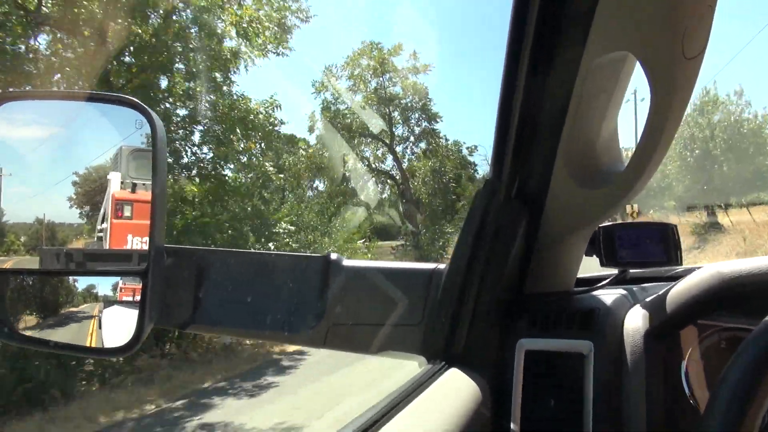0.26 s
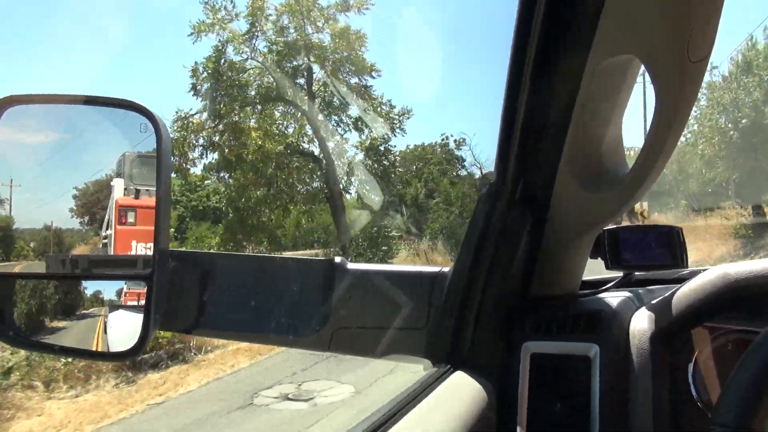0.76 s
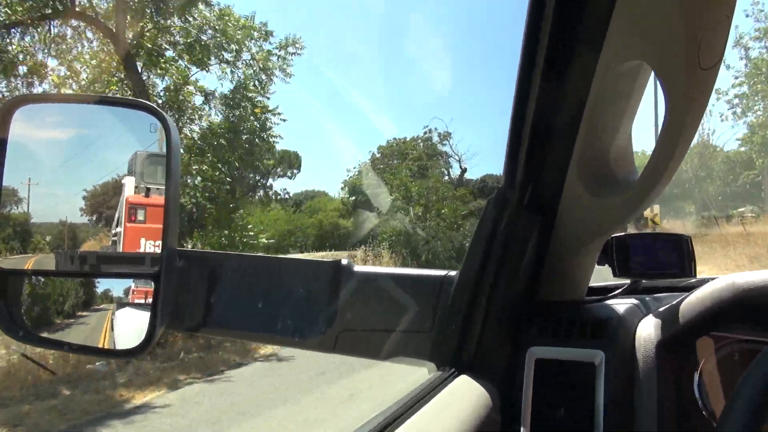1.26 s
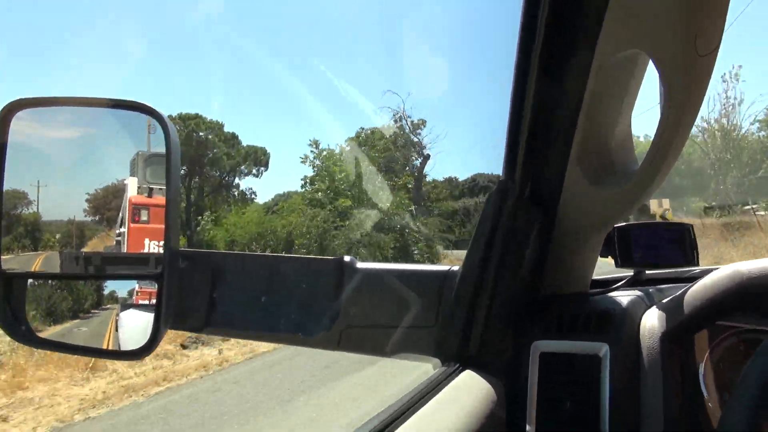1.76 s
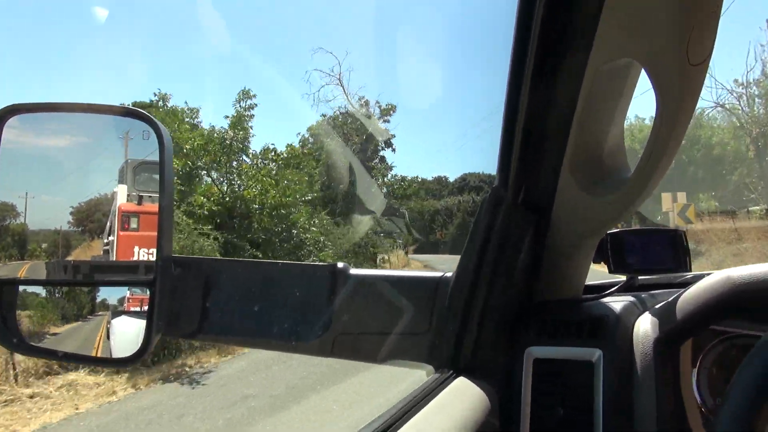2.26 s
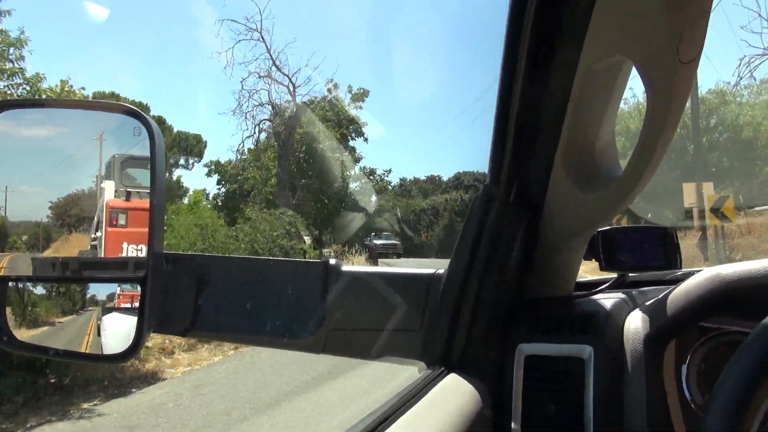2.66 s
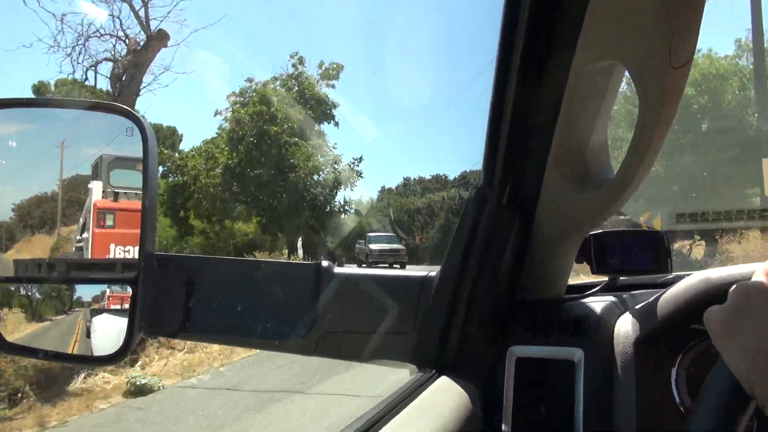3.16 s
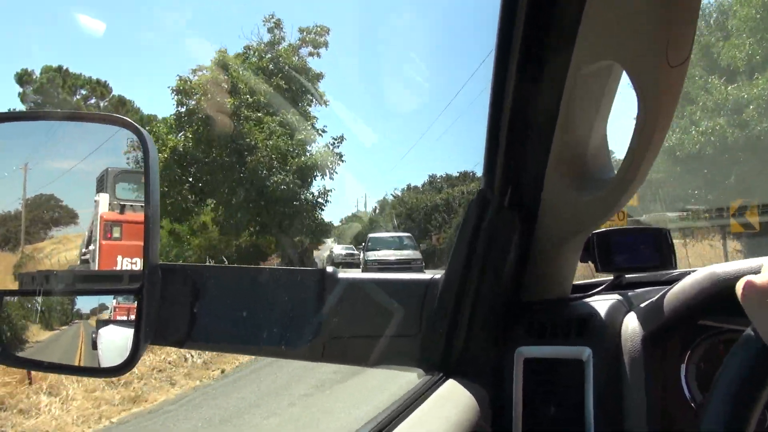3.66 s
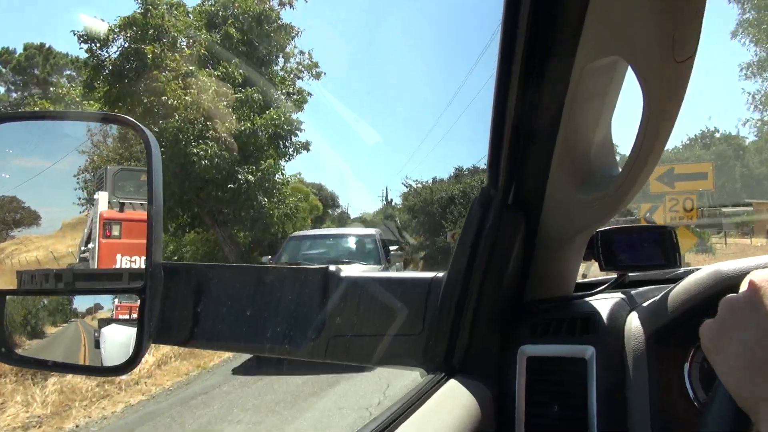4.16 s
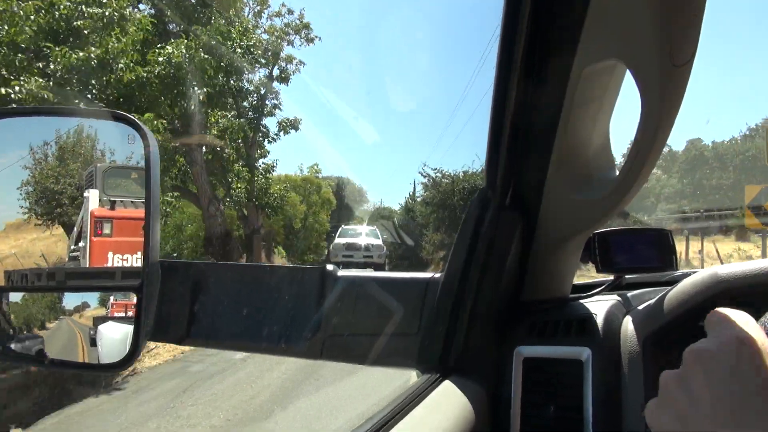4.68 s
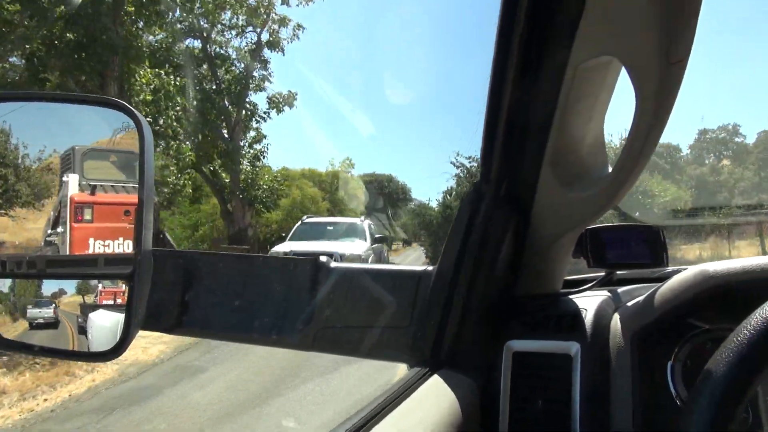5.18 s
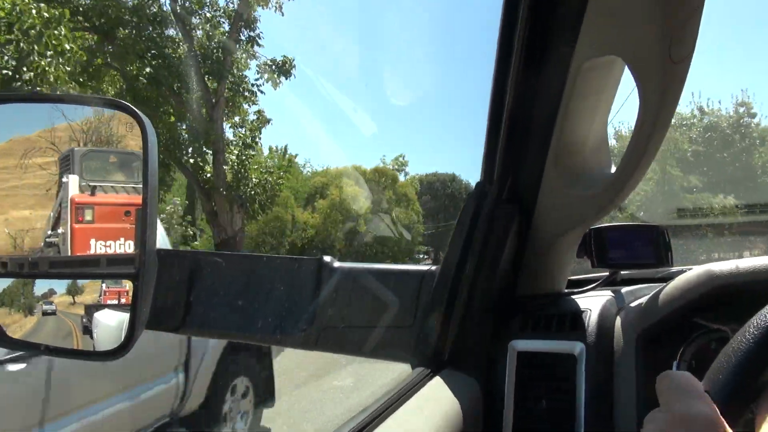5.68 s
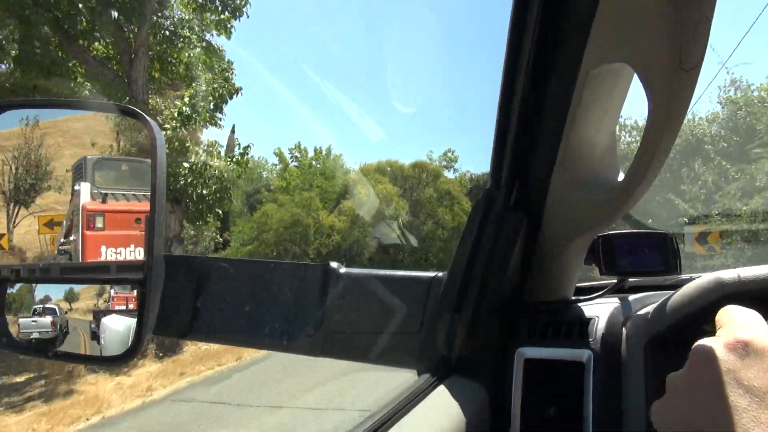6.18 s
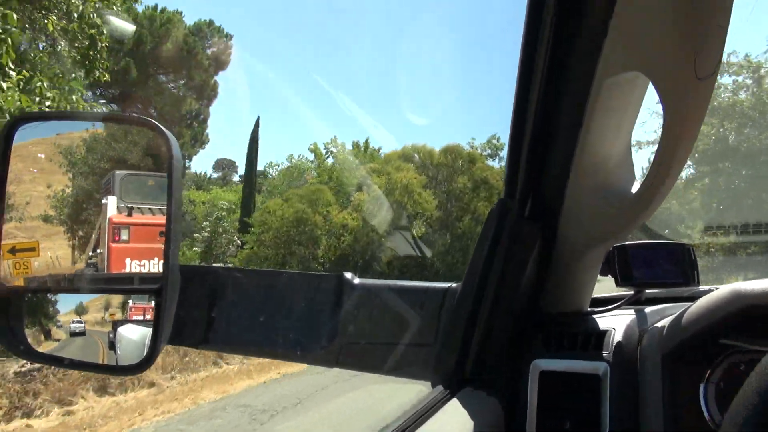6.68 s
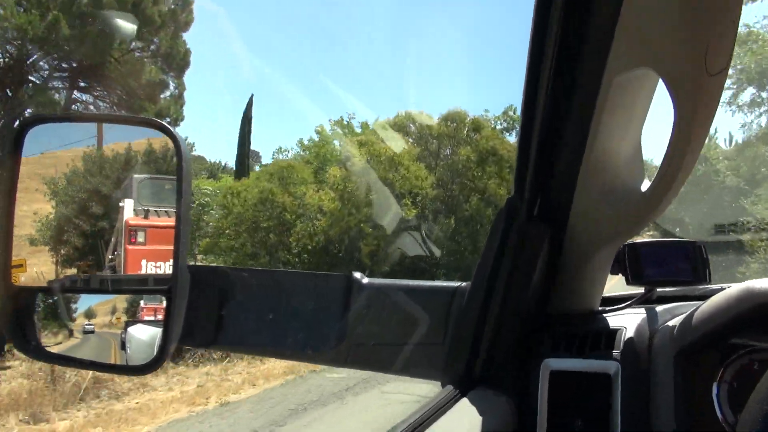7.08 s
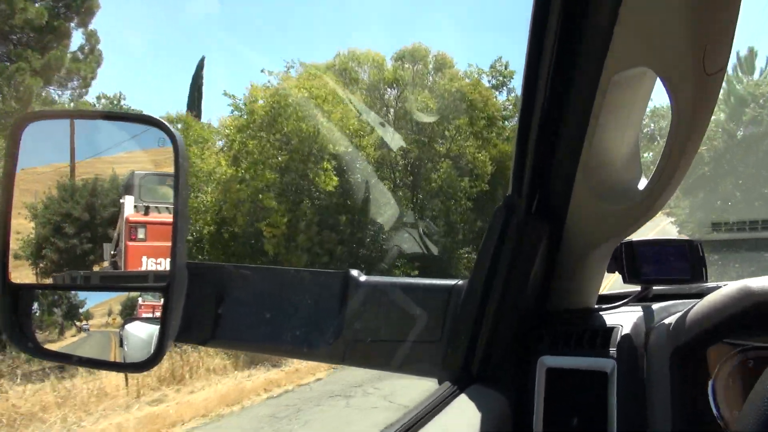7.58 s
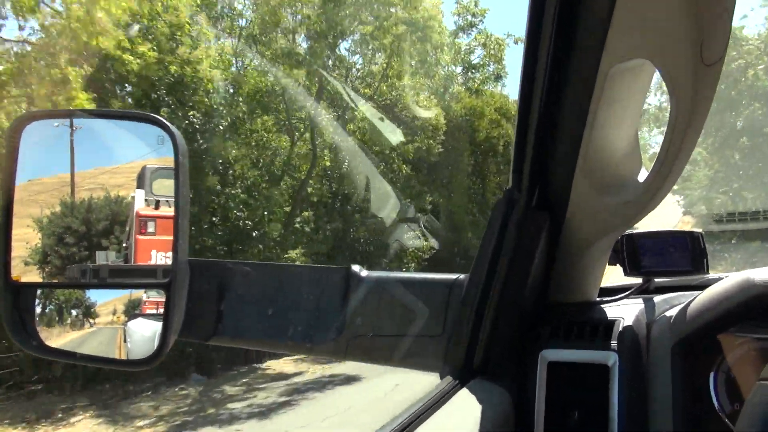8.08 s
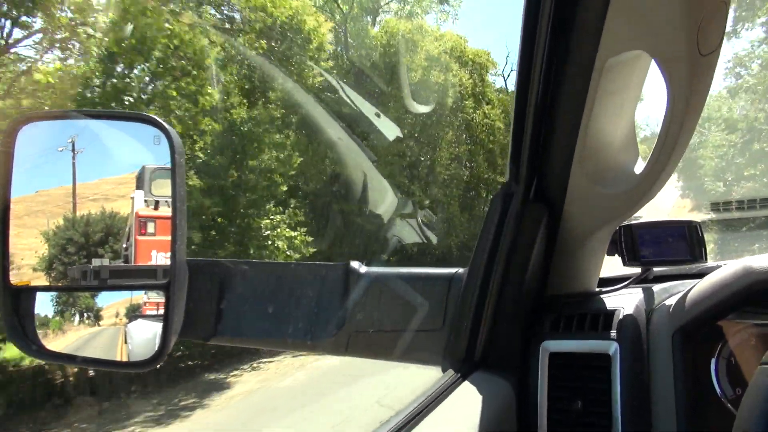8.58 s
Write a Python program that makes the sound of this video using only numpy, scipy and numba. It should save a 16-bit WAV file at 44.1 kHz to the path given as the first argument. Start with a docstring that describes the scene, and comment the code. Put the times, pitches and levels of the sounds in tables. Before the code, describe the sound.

A six-cylinder diesel slows with breathy brake hiss and faint turbo whistle, gives a quick chirp-hoot, then throatily accelerates amid road rumble and gusting wind.

```python
"""Diesel pickup slowing and pulling away

Heard from the cab of a six-cylinder diesel pickup with the window open.
It slows on a hissing exhaust brake, which lets go with a chirp and a hoot; then the engine pulls again.
The engine is a stack of sine waves, one per multiple (order) of its cycle rate, which swell as they
slide through resonances. Filtered noise makes the gas, road, tyres and wind; gliding sines make
the chirp, the hoot and the core of the turbo whistle."""
import sys
import numpy as np
from scipy import signal
from scipy.fft import rfft, irfft, next_fast_len
from scipy.io import wavfile
from scipy.ndimage import uniform_filter1d
from numba import njit

SR = 44100
rng = np.random.default_rng(int(sys.argv[2]) if len(sys.argv) > 2 else 0)


def wav_record(signal):
    """Record a signal, one row per channel, as 16-bit PCM in the file named by sys.argv[1]."""
    frames = np.transpose(np.atleast_2d(signal))
    bounded = np.clip(frames, -1, 1)
    # unit amplitude maps onto the largest positive 16-bit level
    quanta = np.round(bounded * 32767).astype(np.int16)
    wavfile.write(sys.argv[1], SR, quanta)


N = 389844
STEP = 16  # bass and slow controls are worked out once in this many samples
T = np.arange(N) / SR  # time of every sample, seconds
SLOW = T[::STEP]  # time of every slow step, seconds
TOP_HZ = 16400  # the recorder cuts off above this
THUMP_S = .06  # rise and fall of a thump, seconds

# Engine speed. Each row: time in seconds, four-stroke cycles per second in Hz.
SPEED = [(0, 20.8), (.08, 19.8), (.2, 19.6), (.42, 19.6), (.6, 19), (.75, 18.9), (1.28, 18.42),
         (1.92, 17.3), (2.56, 16.3), (3.2, 15.14), (3.84, 14), (4.2, 13.9), (4.55, 13.5), (4.85, 13.36),
         (5.3, 13.37), (6.08, 13.87), (6.9, 14.64), (7.52, 15.77), (8.16, 17.2), (8.84, 18.5)]
# What the engine is doing. Each row: time in seconds, exhaust brake shut (0 to 1), throttle (0 to 1),
# level added to the weak orders in dB.
LOAD = [(0, 0, 0, 1), (.64, 0, 0, -1), (.72, 0.68, 0, -1), (.95, 0.99, 0.01, -1), (2.8, 0.99, 0, -1),
        (4.0, 1, 0, -0.5), (4.1, 0.01, 0.03, -1), (4.19, 0, 0.01, -3), (4.26, 0, .35, -3),
        (4.45, 0, .5, -2), (4.66, 0, .6, -1), (4.85, 0, 1, -1), (6.2, 0, 1, -2), (7.6, 0, 1, 0),
        (8.84, 0, 1, -1.5)]
# Strong orders: multiples of half the firing rate, counted in cycle rates; 6 is the firing rate.
STRONG_ORDERS = [3, 6, 9, 12, 15]
# Their strength before resonance. Each row, one per order: dB coasting, dB braking, dB pulling.
STRONG_DB = [(-5.0, -2.0, -5), (-3.0, -5.0, -9.0), (2.0, -5.0, -18.0), (3.0, -11.0, -13.0),
             (-10, -8.0, -18.5)]
# Booms the strong orders slide through. Each row: centre in Hz, width in Hz, dB coasting,
# dB braking, dB pulling.
BOOM = [(40.9, 9.6, -27.0, -23.5, -66.0), (60.0, 6.0, -37.0, -63.0, -55), (80.1, 6.7, -25.5, -33, -13.0),
        (87.1, 10.2, -33, -21.5, -13.0), (102.06, 6.9, -49, -11.0, -14.0), (109.0, 11.3, -50, -14.5, -9.5),
        (120.0, 6.0, -38, -67.0, -14.0), (148, 10.0, -44.0, -32, -13), (162.8, 11.6, -20, -22.5, -11),
        (171.2, 13.2, -18.0, -12.5, -18.5), (181.0, 14.0, -31.5, -12.0, -16.5),
        (190.3, 7.1, -19, -42.0, -8.0), (204.3, 12.0, -30, -14.0, -34.0), (217.6, 25, -27.5, -21.5, -13.0),
        (241.3, 15.5, -36.5, -15.0, -21), (255.9, 14.1, -40.0, -44.0, -2.0), (279.6, 20, -30, -23.0, -37.0)]
# Weaker orders of the engine cycle, as multiples of the cycle rate.
WEAK_ORDERS = [1, 2, 4, 5, 7, 8, 10, 11, 13, 14, 16, 17, 18, 19, 20, 21, 22, 23, 24, 25, 26]
# Their strength before resonance. Each row, one per order: dB coasting, dB braking, dB pulling.
WEAK_DB = [(-42, -43.0, -64.0), (-38.0, -44, -50.0), (-42, -62.0, -67.0), (-42.0, -53.5, -69),
           (-61, -60.5, -58.5), (-48.0, -56, -55.0), (-52.5, -60.0, -57.0), (-52.0, -54.0, -57.0),
           (-63, -63, -57), (-62.0, -61.5, -50.5), (-62, -62, -53), (-54, -54, -51), (-68, -61, -46),
           (-66, -68, -52), (-72.0, -72.0, -60), (-64, -54, -59), (-63, -68, -63), (-69, -58.0, -58.0),
           (-66.0, -58.0, -66.0), (-74.0, -74.0, -65), (-64, -76, -62)]
# Cab resonances for the weak orders; valve and load change what rings. Each row: centre in Hz,
# width in Hz, dB coasting, dB braking, dB pulling.
CAB = [(109.0, 27, 6, 22.5, 20.0), (140.0, 9.0, -11, -10.0, 6.0), (166.0, 24, 25.0, 23.5, 23.0),
       (177.0, 14.7, 28.5, 35.0, 20.0), (192.2, 18, -7.0, 13.0, 29.5), (218.0, 24.4, 22.0, 23, 18.5),
       (240.7, 15.0, 5.0, 26.0, -15), (259, 20, 3, 14, 23), (282.7, 12.0, 3, 21.5, 13),
       (310.7, 15.5, -11, 23, -11), (327, 17, 6, 23.5, 17), (359.4, 14.0, -10.0, -7.0, 14),
       (432, 15.0, -4.0, -5.0, 17.0)]
# Exhaust growl. Each row: time in seconds, level in dB before the cut off throttle.
GROWL = [(0, -36), (.7, -37.5), (1.02, -34), (1.2, -39), (1.5, -41), (2.1, -38), (3.3, -39.5), (4.4, -41),
         (4.65, -31), (5.5, -30.5), (6.0, -27.5), (6.8, -29), (7.4, -26), (8.0, -26.5), (8.2, -32),
         (8.4, -29.5), (8.84, -32.5)]
# Exhaust pipe resonances. Each row: centre in Hz, width in Hz, dB off throttle, dB on throttle.
PIPE = [(410, 110, -11, -12.5), (481, 55, -12, -11), (585, 44, -6, -9.5), (632, 32, -3, 1),
        (660, 30, 1, -6), (704, 55, -6, -3.5), (765, 30, -10, -11), (871.6, 42, -8, -10),
        (945, 40, -18, -16), (1005, 50, -20, -20)]
# High orders that stand out on throttle. Each entry: order, extra dB at full throttle.
BARK = {30: 3, 33: 5, 35: 4, 36: 3, 38: 3, 39: 5, 41: 7, 45: 6, 47: 6, 50: 3, 51: 4, 52: 3, 53: 4, 55: 3,
        58: 3, 61: 3, 63: 4, 66: 3, 69: 4}
# Rolling noise. Each row: band centre in Hz, dB off throttle, dB on throttle.
ROAD = [(45, -40.5, -44), (65, -48, -50), (100, -39.5, -39), (150, -43, -42), (200, -41, -40),
        (280, -41.5, -42), (380, -43, -44), (520, -47.5, -47), (800, -53, -53), (1050, -54.5, -54)]
# Air buffeting the window. Each row: time in seconds, base level in dB.
BUFFET = [(0, -33), (2.0, -36), (2.5, -43), (3.2, -36), (4.0, -34), (4.3, -45.5), (6.5, -46), (8.84, -44)]
# Stronger buffets. Each row: peak time in seconds, base level in dB.
THUMPS = [(.17, -31), (.78, -30), (1.03, -28), (1.7, -24), (3.79, -28), (7.06, -30), (7.88, -33),
          (8.27, -34), (8.47, -34)]
# Colour of the rushing air. Each row: centre in Hz, width in Hz, dB off throttle, dB on throttle.
RUSH = [(2110, 620, -7, -9), (2544, 310, -7, -11), (2813, 630, -6.5, -8.5), (3500, 950, -2.5, -4),
        (4295, 1100, -1, -1), (5490, 2300, -1.5, -1), (7080, 2560, -1.5, -1.5)]
# Steady wind. The row: base dB of the rush, of its top octave, of its low mids.
WIND_DB = (-51, -66, -50.5)
# Extra wind at full throttle. The row: dB for the rush, for its top octave, for its low mids.
WIND_PULLING_DB = (4, 2.5, 4.5)
# Gas through the shut brake. Each row: time in seconds, base level in dB.
BRAKE_HISS = [(.66, -70), (.7, -46), (1.05, -39), (1.8, -39.5), (2.15, -43), (2.42, -39), (2.9, -39),
              (3.2, -37), (3.8, -36.5), (3.93, -34), (4.01, -32.5), (4.05, -39), (4.095, -50.5), (4.3, -60)]
# Colour of that hiss. The row: dB added for the rush, for its top octave, for its low mids.
BRAKE_TONE_DB = (0, -12.5, -8)
# Swells of rushing air, long and short. Each row: peak time in seconds, rise in seconds,
# fall in seconds, base dB of the rush, of its top octave, of its low mids.
SWELLS = [(.1, .2, 0.63, -50.5, -66, -49.5), (4.27, .05, 0.045, -50, -68, -56),
          (4.78, .08, .12, -46, -70, -55), (5.02, 0.054, 0.044, -43, -63, -50),
          (5.4, .22, .3, -42.5, -69, -49), (5.7, 0.028, .05, -39.5, -60, -43),
          (5.93, 0.17, 0.16, -40.5, -58, -47.5), (6.4, .03, .02, -41.5, -54, -50),
          (7.05, 0.13, .15, -47, -58.5, -46.5), (7.33, .12, 0.27, -38.5, -50.5, -42),
          (7.68, 0.13, .12, -33.5, -47, -39.5), (7.88, .15, 0.16, -36.5, -48.5, -39.5),
          (8.2, 0.14, 0.47, -48, -61, -53), (8.47, .05, .03, -45, -60, -50),
          (8.84, 0.079, .1, -42.5, -58, -44)]
# Breathy turbo whistle. Each row: time in seconds, pitch in Hz, level in dB.
TURBO = [(0, 8500, -91), (.66, 8500, -90), (.72, 8600, -52), (.9, 8800, -54), (1.2, 9400, -50),
         (1.6, 10120, -55), (2.1, 10400, -59), (2.7, 10200, -56), (3.15, 9500, -46), (3.6, 9100, -48),
         (4.0, 8703, -45), (4.1, 8800, -60), (4.4, 9300, -66), (4.6, 9300, -90)]
# Short spits of air or grit. Each row: start in seconds, level in dB before the fade, centre in Hz,
# width in Hz, fade in seconds.
SPITS = [(.686, -38, 1390, 700, 0.027), (2.9, -45, 1200, 400, .02), (3.0, -43, 1200, 400, .02),
         (3.1, -46, 1200, 400, .02), (4.015, -29, 7290, 1500, 0.026), (5.03, -47, 7000, 4000, .02),
         (5.685, -35.5, 7300, 2000, 0.028), (6.04, -42, 7500, 2000, .02), (6.07, -43, 2900, 800, .02),
         (6.395, -40, 5495, 5000, .015), (6.5, -41, 1600, 300, .025), (6.96, -50, 9000, 4000, .02),
         (7.29, -41, 2800, 700, .025), (7.52, -39, 2900, 700, .025), (8.454, -40, 4002, 4000, .02)]
# Faint, broken whistles. Each row: start in seconds, end in seconds, centre in Hz, width in Hz,
# level in dB.
WHISTLES = [(5.95, 6.96, 1990, 80, -52), (6.4, 7.5, 2760, 60, -54), (2.7, 4.0, 3500, 80, -55)]
# Brake valve chirp. The row: start in seconds, end in seconds, first Hz, last Hz, base level in dB.
CHIRP = (3.97, 4.032, 2350, 3000, -30.5)
# Pipe hoot. The row: start in seconds, end in seconds, first Hz, last Hz before the warble,
# base level in dB.
HOOT = (4.018, 4.085, 654.5, 615, -17)
# Tyres of two oncoming cars. Each row: peak time in seconds, rise in seconds, fall in seconds,
# centre in Hz, level in dB.
TYRES = [(4.9, 0.24, .35, 2520, -47.5), (6.1, .6, 0.53, 2720, -49)]
# How alike the two sides are. Each row: frequency in Hz, likeness (0 to 1).
ALIKE = [(60, 1), (170, 1), (260, 0.97), (600, 0.96), (1300, .55), (2900, 0.67), (6300, 0.77), (9000, 0.47),
         (10500, 0.54), (11200, 0.95), (12000, 1)]
# Loudness between the sides. Each row: frequency in Hz, left minus right in dB.
TILT = [(30, 0.8), (60, 0.0), (110, -0.5), (200, -0.7), (370, -0.5), (670, -2.5), (1220, -3.0),
        (2240, -1.0), (4090, 0.0), (7470, 0.5), (13700, 0.0)]
# Timing between the sides. Each row: frequency in Hz, phase by which left leads in radians,
# before a slight trim.
LEAD = [(0, 0), (40, -0.073), (70, -0.03), (150, -0.068), (260, -0.19), (520, -1.03), (780, -1.06),
        (1210, -1.44), (1460, -0.45), (1890, -0.046), (2670, -0.5), (3360, 0.12), (3880, -0.2), (6290, 0.1),
        (7670, -0.1), (9470, 0.5), (9990, 0.26), (13900, -0.0)]


def undb(db):
    """Turn decibels into a gain."""
    return 10 ** (np.asarray(db) / 20)


def unit(x):
    """Scale a sound to an rms level of 1."""
    return x / np.sqrt(np.mean(x ** 2))


def columns(table, t):
    """Read the columns of a curve at times t, with straight lines between rows."""
    seconds, *rest = np.transpose(table)
    return [np.interp(t, seconds, column) for column in rest]


def across(table, hz):
    """Read a spectrum with straight lines on a log-frequency axis."""
    f, value = np.transpose(table)
    return np.interp(np.log(hz + 20), np.log(f + 20), value)


@njit
def svf(x, hz, width):
    """Filter x with a two-state resonator that passes a band, gain 1 at its centre."""
    y, band_state, low_state = np.empty(len(x)), 0., 0.
    g, damping = np.tan(np.pi * hz / SR), width / hz
    for i in range(len(x)):
        v = (band_state + g * (x[i] - low_state)) / (1 + g * (g + damping))
        band_state = 2 * v - band_state
        low_state = low_state + 2 * g * v
        y[i] = damping * v
    return y


def walk(rate):
    """Wander smoothly through random levels, rate of them a second, at the slow pace; spread near 1."""
    hold = int(SR / STEP / rate)
    levels = rng.standard_normal(1500)
    steps = np.repeat(levels, hold)[:len(SLOW)]
    return 1.31 * uniform_filter1d(uniform_filter1d(steps, hold), hold)


def band(hz, width, size=N):
    """Make two unrelated noise bands by filtering twice; a smaller size means the slow pace."""
    hz, width = hz * N / size, width * N / size
    noises = rng.standard_normal((2, size))
    return unit(np.array([svf(svf(noise, hz, width), hz, width) for noise in noises]))


def held(gain):
    """Bring a slow control up to the full pace."""
    return np.interp(T, SLOW, gain)


def bump(peak, rise, fall):
    """A bell in power that rises and falls at its own pace."""
    return np.exp(-((SLOW - peak) / np.where(SLOW < peak, rise, fall)) ** 2)


def resonance_db(modes, hz, floor_db):
    """Gain in dB at hz of steep resonances whose powers add above a floor."""
    power = undb(2 * floor_db)
    for centre, width, db in modes:
        power = power + undb(2 * db) / (1 + (2 * (hz - centre) / width) ** 2) ** 2
    return 10 * np.log10(power)


def cycle_orders(hz, turn, start):
    """Low orders of the four-stroke cycle: sines that swell as they slide through resonances."""
    brake, throttle, weak_db = columns(LOAD, SLOW)

    def loaded(coasting, braking, pulling):
        return coasting + brake * (braking - coasting) + throttle * (pulling - coasting)

    boom, cab = ([(f, w, loaded(*db)) for f, w, *db in modes] for modes in (BOOM, CAB))
    levels = {}
    for k, db in zip(STRONG_ORDERS, STRONG_DB):
        levels[k] = loaded(*db) + resonance_db(boom, k * hz, -58)
    for k, db in zip(WEAK_ORDERS, WEAK_DB):
        waver_db = 1.2 * walk(3)
        levels[k] = loaded(*db) + weak_db + resonance_db(cab, k * hz, 0) + waver_db
    low = 0
    for k, db in levels.items():
        flicker_db = .85 * walk(12) + .75 * walk(5)
        wobble = .013 * walk(7)  # radians of the cycle
        low = low + undb(db + flicker_db) * np.sin(k * (turn + wobble) + start[k])
    return np.sqrt(2) * low


def exhaust_growl(hz, turn, start):
    """High orders and turbulent gas ring the exhaust pipe; on throttle they throb with the engine."""
    throttle = columns(LOAD, SLOW)[1]
    growl_db, = columns(GROWL, SLOW)
    pipe = [(f, w, off + throttle * (on - off)) for f, w, off, on in PIPE]
    growl = 0
    # high orders drift in phase and level, since no two firings are alike
    for k in range(max(WEAK_ORDERS) + 1, len(start)):
        db = resonance_db(pipe, k * hz, -33) + throttle * BARK.get(k, 0) + 2.4 * walk(3.002)
        smear = .009 * (k / 40) * walk(20)  # radians of the cycle
        growl = growl + undb(db) * np.sin(k * (turn + smear) + start[k])
    growl = unit(growl * np.sqrt(hz)) * undb(growl_db - 6.5 * (1 - throttle))
    # turbulent gas rings the same pipe, in lumps
    gas = unit(sum(undb(db) * band(f, 1.2 * w, size=len(SLOW)) for f, w, db in pipe))
    gas = gas * undb(growl_db - .96 - 5 * throttle + 1.5 * walk(60) + .8 * walk(25))
    # one throb a firing, and one cylinder barks louder once a cycle, 2.5 radians into it
    firing = STRONG_ORDERS[1] * turn
    throb = 1 + throttle * (.15 * np.cos(turn - 2.5) + .22 * np.cos(firing))
    return throb * (growl + gas)


def engine():
    """All orders follow one turning cycle; row 0 is the direct sound, row 1 another path round the cab."""
    hz, = columns(SPEED, SLOW)
    turn = 2 * np.pi * np.cumsum(hz) * STEP / SR
    start = 2 * np.pi * rng.random((80, 2, 1))  # a starting phase per order and path
    return cycle_orders(hz, turn, start) + exhaust_growl(hz, turn, start)


def road():
    """Rolling noise through the floor, swelling over the bumps, and air buffeting the open window."""
    bumps, throttle = walk(1.49), columns(LOAD, SLOW)[1]
    rolling = 0
    for hz, off, on in ROAD:
        db = off + throttle * (on - off) + 1.6 * bumps + 1.6 * walk(6)
        rolling = rolling + undb(db) * band(hz, hz / 2, size=len(SLOW))
    buffet_power = undb(2 * (columns(BUFFET, SLOW)[0] + 2.4 * walk(6)))
    for peak, db in THUMPS:
        buffet_power = buffet_power + undb(2 * db) * bump(peak, THUMP_S, THUMP_S)
    return rolling + band(23.7, 14, size=len(SLOW)) * np.sqrt(buffet_power) * undb(-2.0)


def air_db():
    """Base levels of rush, top octave and low mids: wind, brake gas and swells add as powers."""
    def col(db):
        return np.array(db)[:, None]

    throttle = columns(LOAD, SLOW)[1]
    power = undb(2 * (col(WIND_DB) + col(WIND_PULLING_DB) * throttle ** 2))
    power = power + undb(2 * (columns(BRAKE_HISS, SLOW)[0] + col(BRAKE_TONE_DB)))
    for peak, rise, fall, *db in SWELLS:
        power = power + undb(2 * col(db)) * bump(peak, rise, fall)
    return 10 * np.log10(power)


def rushing_air(firing):
    """Wind and brake gas as flickering noise bands; on throttle the low mids pulse once a firing."""
    rush_db, top_db, mid_db = air_db()
    throttle = columns(LOAD, SLOW)[1]
    rush = 0
    for hz, width, off, on in RUSH:
        db = off + throttle * (on - off) + 1.3 * walk(60) + 1.1 * walk(36) + .8 * walk(1.47)
        rush = rush + held(undb(db)) * band(hz, width)
    rush = unit(rush) * held(undb(rush_db + 1.0))
    top = undb(-2.0) * band(9400, 2800) + undb(-6) * band(11870, 3400)
    top = top * held(undb(top_db + .8 + 1.1 * walk(40)))
    mid = band(1478, 230) + undb(-3) * band(1780, 400) + undb(-5) * band(1284, 260)
    pulse = 1 + .2 * throttle * np.cos(firing)
    mid = mid * held(undb(mid_db - 1.1 + 1.33 * walk(40)) * pulse)
    return rush + top + mid


def turbo_whistle():
    """A gliding sine made breathy by multiplying it with low noise."""
    hz, db = columns(TURBO, T)
    breath = band(30, 450) * held(undb(2.5 * walk(8)))
    return breath * np.sin(2 * np.pi * np.cumsum(hz) / SR) * undb(db)


def spits():
    """Short bursts of filtered noise with a 4 ms rise and an exponential fade."""
    out, length = np.zeros((2, N)), SR // 4
    for s, db, hz, width, fade in SPITS:
        span = slice(int(s * SR), int(s * SR) + length)
        age = T[span] - s + 1 / SR
        noises = rng.standard_normal((2, length))
        air = [svf(svf(noise, 1. * hz, 1. * width), 1. * hz, 1. * width) for noise in noises]
        envelope = (1 - np.exp(-age / .004)) * np.exp(-age / fade)
        out[:, span] += undb(db) * envelope * unit(np.array(air))
    return out


def faint_whistles():
    """Narrow noise bands sound like broken whistles, each swelling and dying away."""
    out = np.zeros((2, N))
    for t0, t1, hz, width, db in WHISTLES:
        arch = np.sin(np.pi * np.clip((T - t0) / (t1 - t0), 0, 1))
        out += undb(db) * arch * held(undb(3 * walk(9))) * band(hz, width)
    return out


def brake_chirp():
    """The opening brake valve chirps: a rising sine roughened by noise."""
    t0, t1, from_hz, to_hz, db = CHIRP
    part = np.clip((T - t0) / (t1 - t0), 0, 1)
    glide = from_hz + (to_hz - from_hz) * part ** 2
    tone = np.sin(np.pi * part) * np.sin(2 * np.pi * np.cumsum(glide) / SR)
    return (.8 + .5 * band(90, 200)) * undb(db) * tone


def pipe_hoot():
    """The pipe hoots as the valve opens: a sine that sags and warbles, roughened by escaping gas."""
    t0, t1, from_hz, to_hz, db = HOOT
    part = np.clip((T - t0) / (t1 - t0), 0, 1)
    glide = from_hz + (to_hz - from_hz) * part + 12 * held(walk(150))
    flutter = 1 + .4 * band(70, 160)
    tone = np.sin(np.pi * part ** .85) * np.sin(2 * np.pi * np.cumsum(glide) / SR)
    return np.sqrt(np.abs(flutter)) * undb(db) * tone


def oncoming_tyres():
    """Tyres of passing cars: noise bands that rise and fall like a bell."""
    out = 0
    for peak, rise, fall, hz, db in TYRES:
        out = out + undb(db) * held(np.sqrt(bump(peak, rise, fall))) * band(hz, hz / 3)
    return out


def outside():
    """Gusts shake all that comes through the window; it throbs a little once a firing and once a cycle."""
    cylinders = 6
    brake = columns(LOAD, SLOW)[0]
    firing = 2 * np.pi * cylinders * np.cumsum(columns(SPEED, SLOW)[0]) * STEP / SR
    cycle_throb = (.032 + .062 * brake) * np.cos(firing / cylinders - 2.1)
    gust = undb(.59 * walk(50)) * (1 + .06 * np.cos(firing) + cycle_throb)
    return held(gust) * (rushing_air(firing) + turbo_whistle() + faint_whistles() + oncoming_tyres())


def scene():
    """Two microphone ports share the direct sound and differ by the other path, a small lag and tilt."""
    rim = 2000  # mirrored samples, so the sound goes on past both ends
    slow_paths = engine() + road()
    paths = signal.resample_poly(slow_paths, STEP, 1, axis=1, padtype="reflect")[:, :N]
    paths = paths + outside() + spits() + brake_chirp() + pipe_hoot()
    size = next_fast_len(N + 2 * rim)
    direct, other = rfft(np.pad(paths, ((0, 0), (rim, size - N - rim)), mode="reflect"))
    hz = np.arange(len(direct)) * SR / size
    alike = np.clip(across(ALIKE, hz), 0, 1)
    side = np.array([[1], [-1]])  # left, right
    ports = np.sqrt((1 + alike) / 2) * direct + side * np.sqrt((1 - alike) / 2) * other
    tilt = undb(side * across(TILT, hz) / 2)
    lead = np.exp(complex(0, .99) * side * across(LEAD, hz) / 2)
    return irfft(ports * tilt * lead, size)[:, rim:rim + N]


def record(dry):
    """The recorder rounds the peaks, dulls the top and cuts it off."""
    rounded = np.tanh(2.207 * dry) / 1.873
    soft = signal.sosfilt(signal.butter(2, 13000, fs=SR, output="sos"), rounded)
    cut = signal.ellip(8, .2, 70, TOP_HZ, fs=SR, output="sos")
    return signal.sosfilt(cut, soft)


dry = scene()
out = record(dry)
wav_record(out)
```